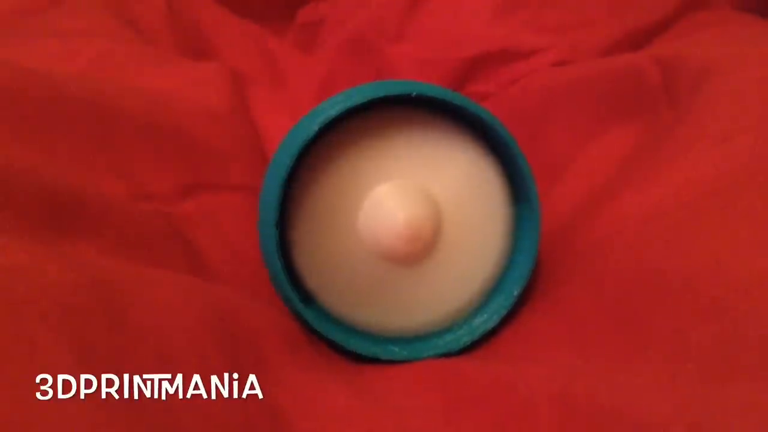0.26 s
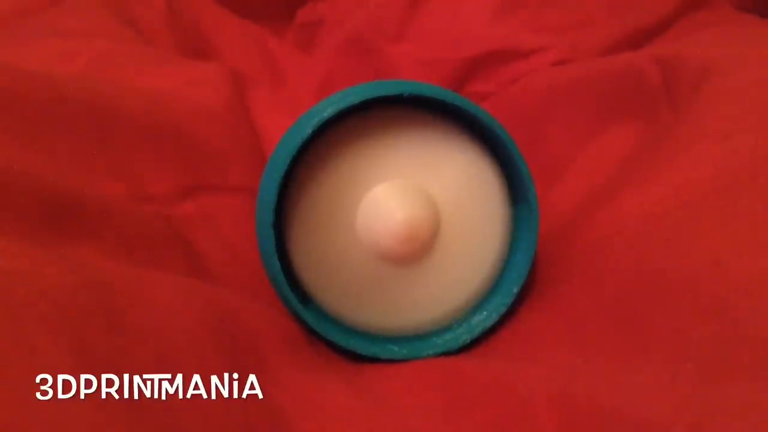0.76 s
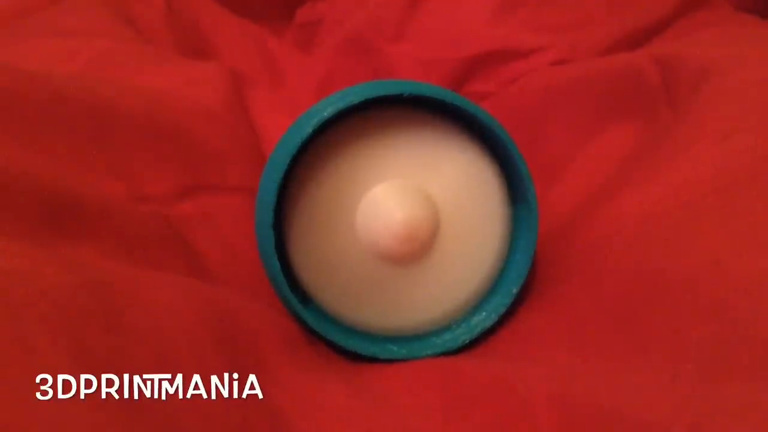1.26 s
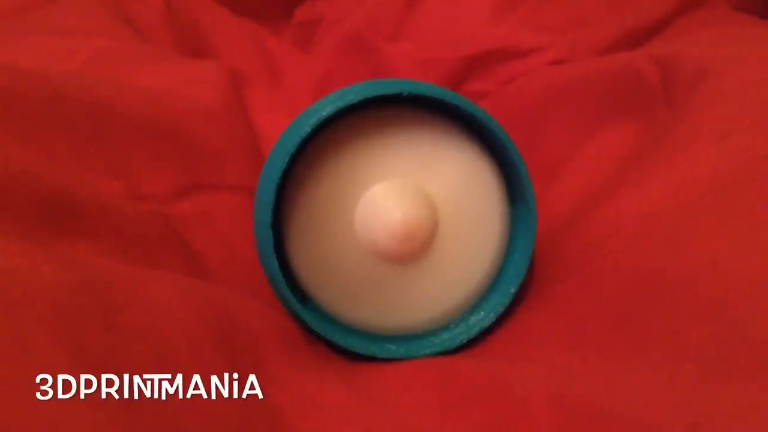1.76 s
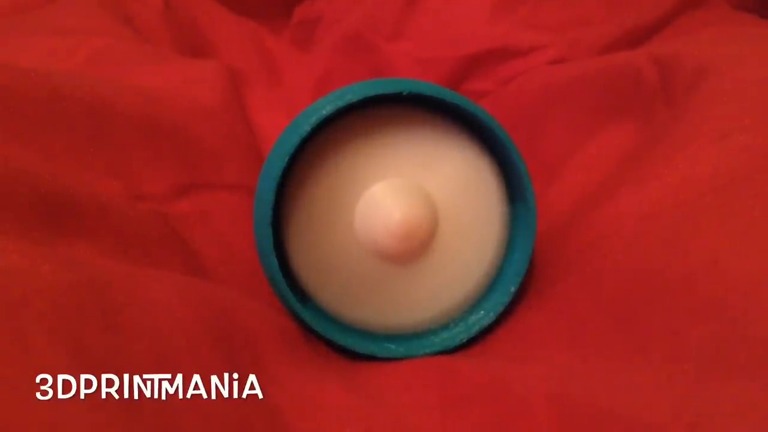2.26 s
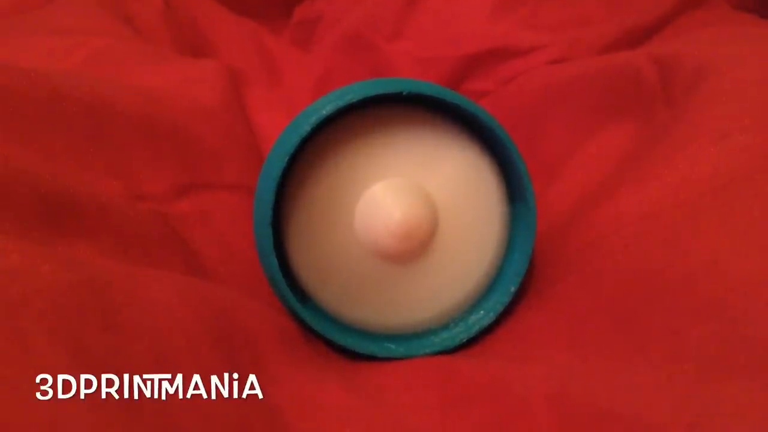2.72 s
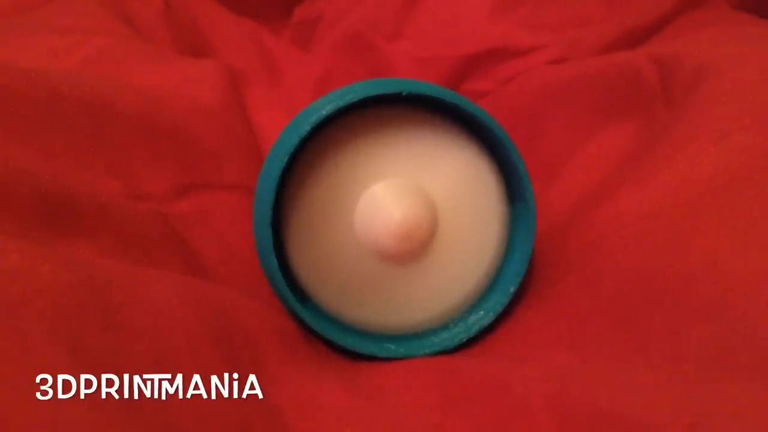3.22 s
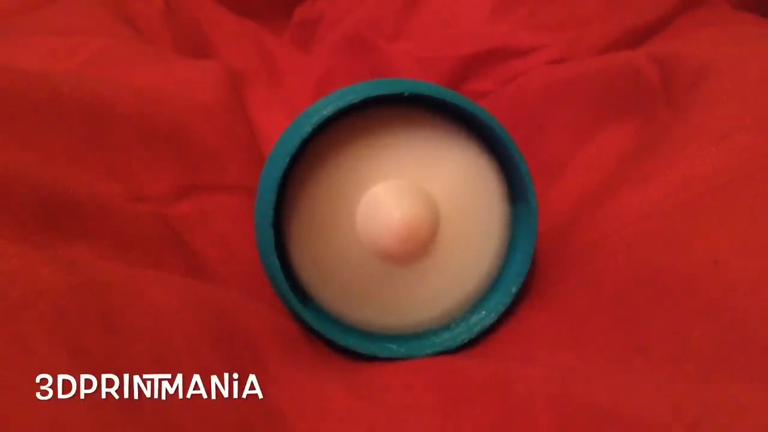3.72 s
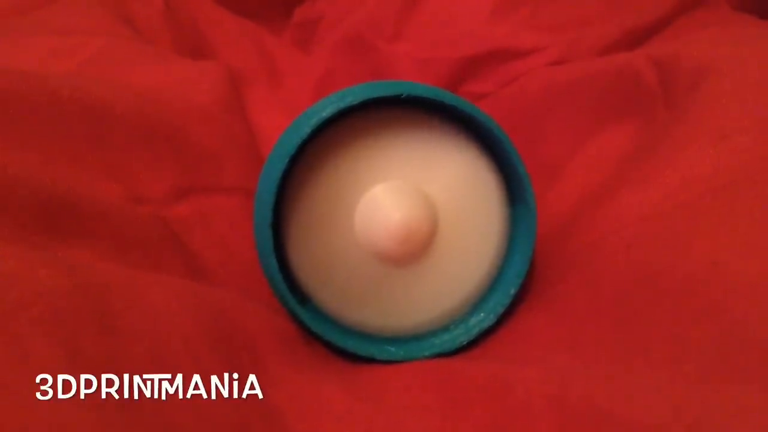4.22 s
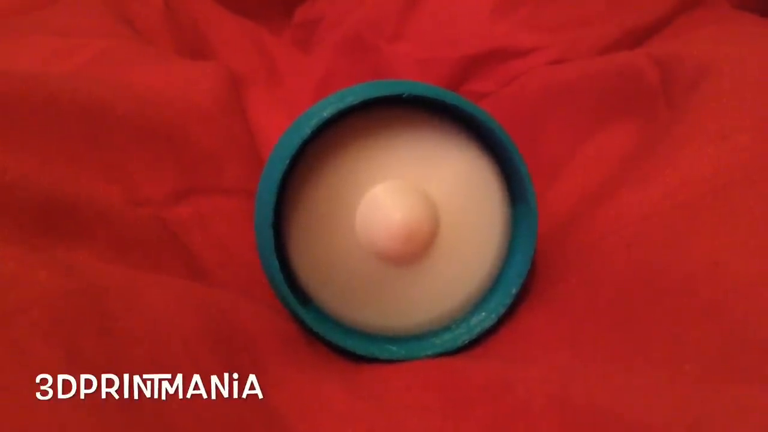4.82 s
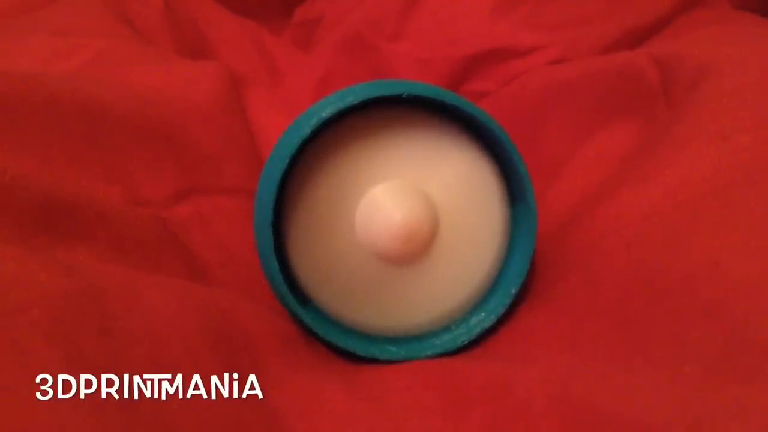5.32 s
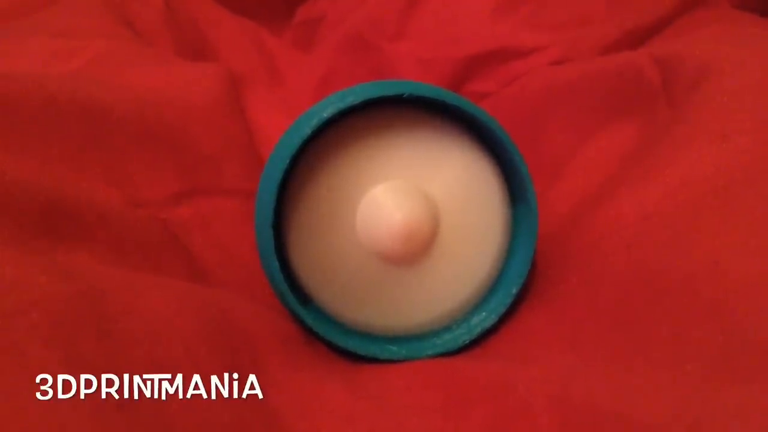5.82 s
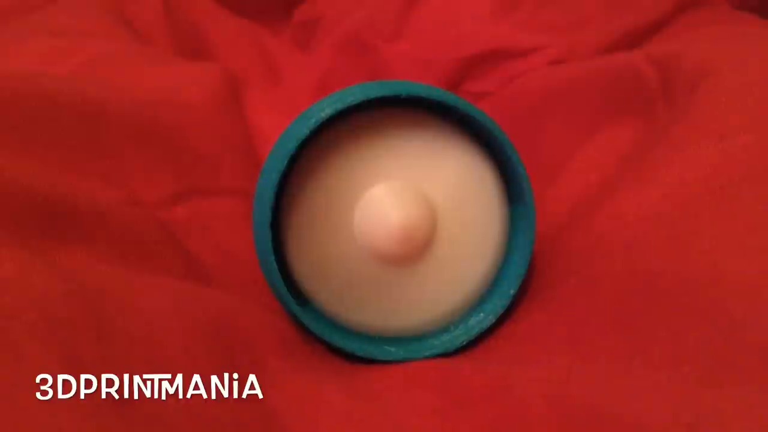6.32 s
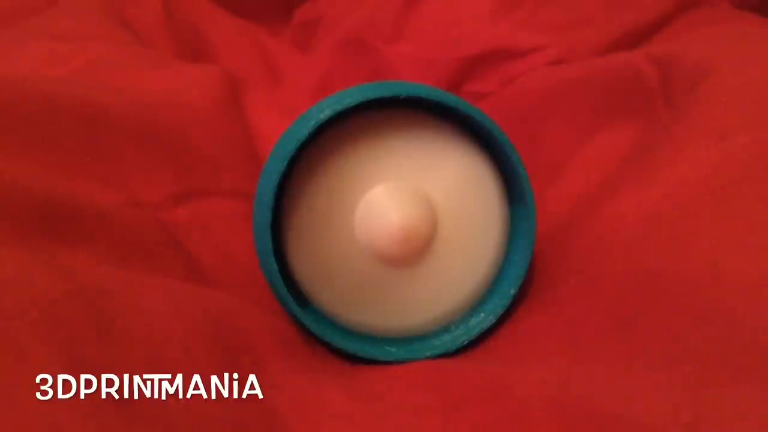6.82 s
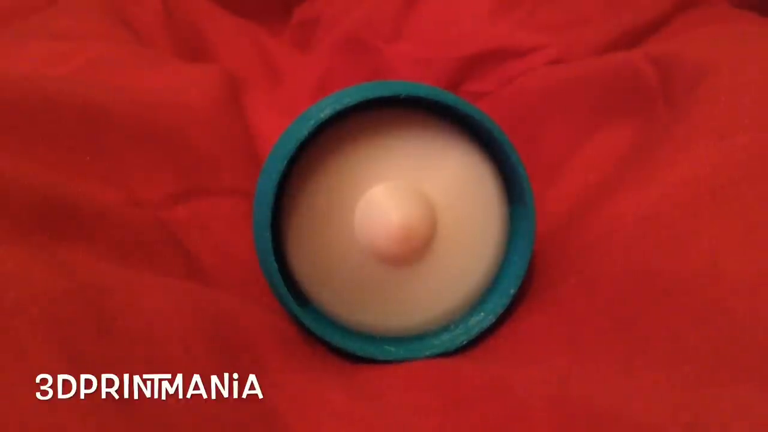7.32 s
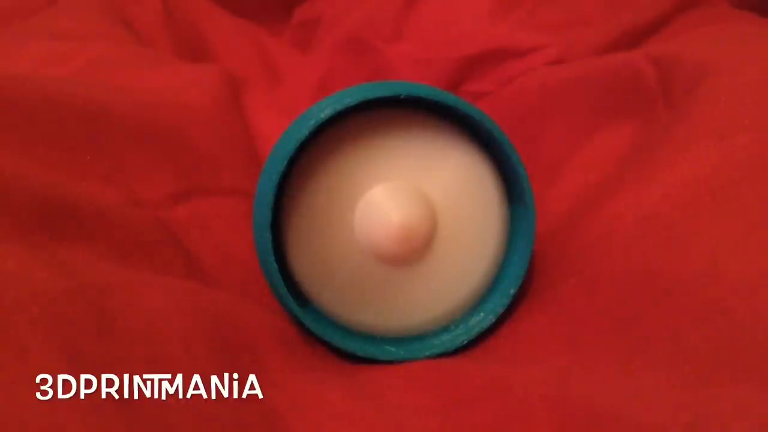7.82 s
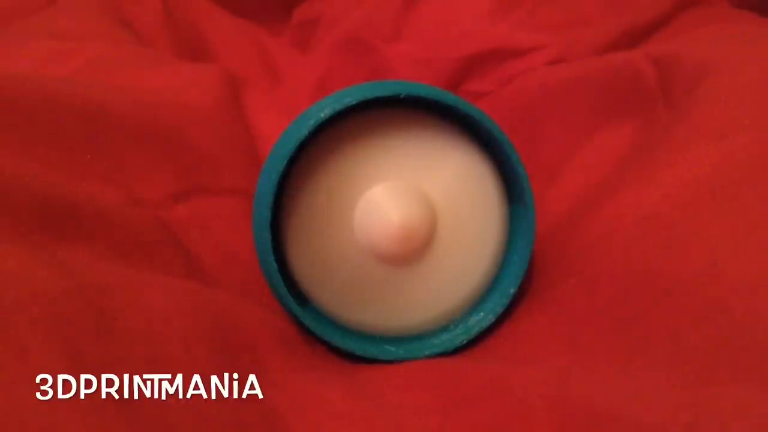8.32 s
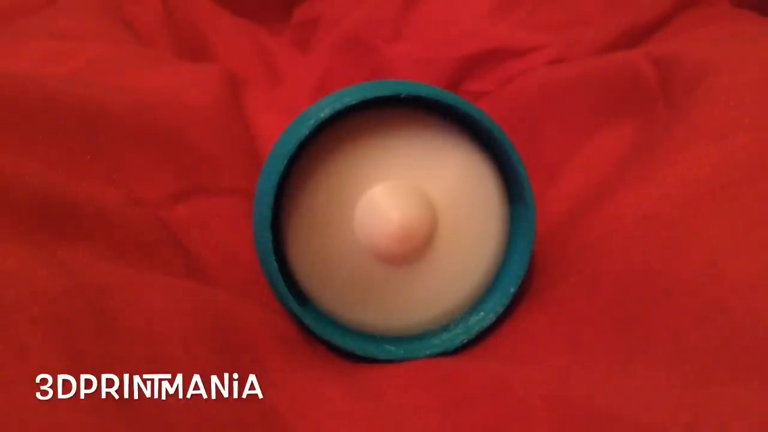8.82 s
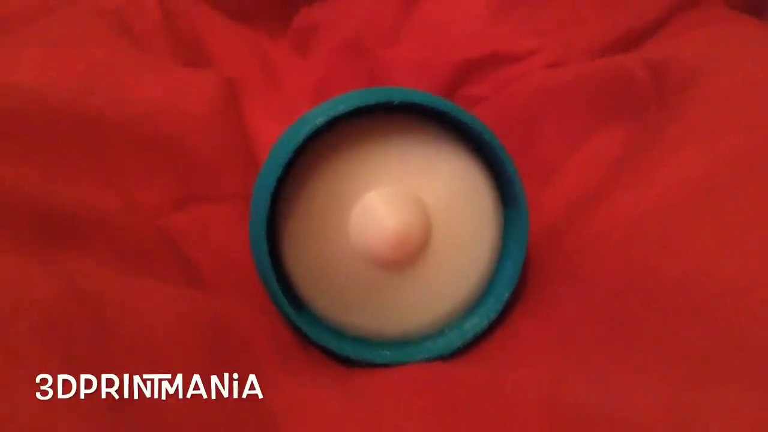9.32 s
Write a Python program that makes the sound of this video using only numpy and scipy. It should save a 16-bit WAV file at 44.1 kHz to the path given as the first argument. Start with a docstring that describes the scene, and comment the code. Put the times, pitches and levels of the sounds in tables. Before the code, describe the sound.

Brief cloth rustle and faint finger ticks, then a small brushed-motor fan spins up to a steady shrill whine with hum, airy rush and scattered taps.

```python
"""A small ducted fan on a cloth is switched on, spins up within two seconds and slowly loses speed.
Its rotor hums once and twice a turn, sings blade tones and pushes a rush of air through the duct;
the brushed motor sings a comb of shaft orders through its can, over brush hiss.
The chopped supply buzzes at a nearly fixed rate, as harmonics in step shaped by the windings.
A hand nearby rustles the cloth and ticks, in a quiet room with a faint hiss and steady hums."""
import sys
import numpy as np
from scipy import signal
from scipy.fft import rfft, irfft, next_fast_len
from scipy.io import wavfile

SR = 44100
rng = np.random.default_rng(int(sys.argv[2]) if len(sys.argv) > 2 else 0)


def unload_audio(sound):
    """Save the sound as a 16-bit wav file, at the path given as the first command line argument."""
    columns = np.transpose(np.atleast_2d(sound))
    # keep every value between -1 and 1, then stretch to whole-number steps
    steps = np.round(np.clip(columns, -1, 1) * 32767)
    wavfile.write(sys.argv[1], SR, steps.astype(np.int16))


def magnitude_from_level(level_db):
    """Linear magnitude for a level in decibels (20 dB per decade)."""
    exponent = np.asarray(level_db, float) / 20
    return 10 ** exponent


N = 421596
STEP = 64   # samples between values of a slow signal

# shaft speed the sagging supply can hold: time_s, turns_per_s
HELD_SPEED = [(.26, 108.115), (3.5, 106.86), (4.1, 106.58), (4.7, 106.15), (5.3, 105.88), (5.9, 105.45),
              (6.5, 105.33), (7.1, 104.97), (8.3, 104.46), (8.9, 104.45), (9.56, 104.15)]
# once-a-turn hum through the stand, before its slow fade: pitch_hz, level_db (rms)
ONCE_A_TURN = [(43, -90), (64, -74), (79, -62), (87, -81), (95, -58), (101, -52), (105.5, -49)]
# twice-a-turn hum through the duct: pitch_hz, level_db (rms)
TWICE_A_TURN = [(90, -92), (150, -64), (175, -52), (195, -62), (215, -65)]
# blade tones at top speed, before the duct resonance: multiple (of the shaft rate), level_db (rms), wobble_db
ROTOR_TONES = [(14, -68, 3), (15, -65, 3), (20, -56, 2.5), (26, -70, 3), (35, -71, 3), (39, -70, 3),
               (40, -69, 3), (41, -60, 2.5), (43, -70, 3)]
# duct resonance that carries the top rotor tones: pitch_hz, gain_db
DUCT_RESONANCE = [(3000, -22), (3900, -12), (4150, 1.7), (4500, -1.5)]
# colour of the motor can, one order before its own offset and the song level: pitch_hz, level_db (rms)
CAN_COLOUR = [(5600, -73), (5900, -71.2), (6250, -70.5), (6500, -62.8), (6800, -56.9), (7100, -58.5),
              (7450, -55.6), (7690, -50.5), (7735, -61), (7800, -60), (7950, -47.5), (8120, -41.1),
              (8400, -41.9), (8560, -49.1), (8700, -55), (8900, -64.4), (9300, -61.5), (9600, -68),
              (10300, -65.6), (11000, -72), (12300, -71.1), (13300, -62), (13700, -70)]
# level of the motor song over time: time_s, gain_db
SONG_LEVEL = [(.26, -18), (.45, 4), (.6, -2), (.8, 2), (1.3, 2), (4, 1), (8, 2), (9.56, 0)]
# the orders repeat in tens, one entry for each last digit of the multiple: gain_db
ORDER_PATTERN = [-1.6, .3, .9, -4.8, 2.1, -1.9, .5, 2.2, 4.3, -7.1]
# orders that break the pattern: multiple (of the shaft rate), extra_db
ODD_ORDERS = [(59, 10.6), (61, 10.2), (63, 10.5), (66, 8.6), (67, -8.7), (70, 4.2), (75, -10.2),
              (77, -14.8), (78, -12.5), (79, -10.8), (80, -8.2), (81, -8.8), (85, 3.4), (86, -3.1),
              (88, -7.7)]
# spectrum shape of the brush hiss: pitch_hz, density_db (per Hz, relative)
BRUSH_SPECTRUM = [(3900, -17), (4300, -11), (4700, -41), (5600, -27), (6300, -13), (6800, -21),
                  (7500, -48.5), (8300, 1.5), (8900, -18), (9500, -12), (10500, -10), (11000, -26),
                  (12300, -17), (13400, -4)]
# spectrum shape of the air rush: pitch_hz, density_db (per Hz, relative)
AIR_SPECTRUM = [(30, -32.5), (120, -6), (210, -0.5), (340, -3), (430, -9), (530, -2), (1100, -5),
                (1400, -4.5), (1900, 1.75), (2500, -4), (3700, -12), (4250, -11), (5400, -17), (9000, -44)]
# rate of the supply chopping: time_s, rate_hz
CHOP_RATE = [(.27, 204.6), (.5, 204.34), (2, 204.31), (5, 204.26), (9.56, 204.18)]
# resonances of the windings: centre_hz, top_db (rms), fall_below_db_per_khz, fall_above_db_per_khz
WINDING_RESONANCES = [(3270, -70, 80, 80), (4170, -67, 40, 40), (9230, -61, 60, 10), (10070, -45.8, 39, 36),
                      (12440, -48.5, 17.5, 105), (13330, -58, 20, 60), (15150, -55.5, 25, 120)]
# hand rubbing on cloth: start_s, length_s, level_db
CLOTH_RUBS = [(0, 0.06, -62), (0.164, 0.066, -56), (0.236, .022, -54)]
# ticks of the hand: start_s, peak_db, favoured_hz (pitch that the blow favours), contact_ms
HAND_TICKS = [(.012, -41.5, 1090, 3), (.056, -44.5, 1190, 4.8), (.161, -49, 1900, 1.5),
              (.2393, -27.5, 1060, 0.11), (.367, -38, 1500, 2.8), (1.069, -37, 900, 2.8),
              (1.145, -32.5, 1190, 2.2), (3.9317, -14, 1070, 1.3), (4.4993, -29, 2000, 1.5),
              (4.9627, -25.5, 780, 0.98), (5.609, -30, 1800, 2), (6.311, -27.5, 5900, 6.5),
              (9.02, -44, 150, 4.4), (9.18, -40, 200, 4), (9.3995, -31, 230, 1.2)]
# modes that a tick rings: pitch_hz, level_db (for a blow favouring that pitch), t60_s
RINGING_MODES = [(209, -5, 0.032), (370, -10, 0.023), (734, -50, 0.023), (850, -6, 0.037),
                 (1130, -4.5, 0.022), (1500, -2, 0.015), (1900, -7, 0.0059), (2640, 8, 0.011),
                 (3550, -3, 0.02), (4700, 1, 0.0068), (5920, 4, 0.03)]
# spectrum shape of the room hiss: pitch_hz, density_db (per Hz, relative)
ROOM_SPECTRUM = [(60, -46), (105, -39), (160, 0), (450, -32), (1070, -21), (3190, -18.5), (4300, -7),
                 (5200, -29), (6110, -38), (6550, 2), (7890, 5), (9070, -6), (9960, -23), (13300, -21),
                 (13800, -53)]
# faint steady hums in the room: pitch_hz, level_db (rms)
ROOM_HUMS = [(108, -79), (151, -74), (540, -77.5), (840, -72.5), (1435, -75)]
# narrow treble bands left weak or nearly empty: centre_hz, half_width_hz, gain_db
THIN_BANDS = [(11020, 118, -8.5), (14170, 220, -40)]

SWITCH_ON_S, BREAKAWAY_S, SPIN_UP_S = .267, .19, .3945
SHORTFALL = 1.06   # of the natural log of speed, at switch-on
HUM_FADE_DB_PER_S = 0.28
FIRST_MULTIPLE, LAST_MULTIPLE = 53, 127   # motor orders
BRUSH_HISS_DB = -49   # before it follows a share of the song level
RUSH_DB, RUSH_DB_PER_DECADE, SLOW_RUSH_DB = -43, 68, -59   # at top speed, growth with speed, least level
FAINTEST_DB, WHINE_FIZZ_DB = -73, -17   # weakest supply harmonic kept, unevenness of its pulses
RUB_ATTACK_S, RUB_RELEASE_S, CLOTH_SETTLING_DB = .004, .008, -69.5
ROOM_DB = -48   # hiss before throb and thinning
THROB_HZ, THROB_DEPTH, THROB_FADE_S = 36.5, .55, .35
HISS_THINS_DB, HISS_THINS_S = -2, 3.9


def rms_one(x):
    """Scale to rms 1."""
    return x / np.sqrt(np.mean(x ** 2) + 1e-20)


def seconds():
    """Time of every sample."""
    return np.arange(N) / SR


def in_time(rows):
    """Read a (time, value) table at every sample."""
    s, values = np.transpose(rows)
    return np.interp(seconds(), s, values)


def at_hz(points, hz):
    """Read a spectrum on a log-frequency axis."""
    point_hz, point_db = np.transpose(points)
    return np.interp(np.log(hz), np.log(point_hz), point_db)


def stretch(slow):
    """From one value every STEP samples to one a sample."""
    return np.interp(np.arange(N), STEP * np.arange(len(slow)), slow)


def drift(rate_hz):
    """Slow random wander of rms 1, one value every STEP samples."""
    r = np.exp(-2 * np.pi * rate_hz * STEP / SR)
    noise = rng.standard_normal(N // STEP + 1002)
    wander = signal.lfilter([1], [1, -2 * r, r * r], noise)
    return rms_one(wander[1000:])   # without the filter's start


def coloured(spectrum, beyond_db):
    """Noise of rms 1 with the given spectrum, much weaker beyond its ends."""
    size = next_fast_len(N)
    hz = np.arange(size // 2 + 1) * SR / size + 1e-3
    inside = (hz > spectrum[0][0]) & (hz < spectrum[-1][0])
    gain = magnitude_from_level(at_hz(spectrum, hz) + np.where(inside, 0, beyond_db))
    return rms_one(irfft(rfft(rng.standard_normal(size)) * gain, size)[:N])


def tone(angle, slow_db, wobble_db, wobble_hz):
    """A sine whose level and phase wander a little."""
    gain = magnitude_from_level(slow_db + wobble_db * drift(wobble_hz))
    slip = rng.uniform(0, 2 * np.pi) + 0.35 * drift(wobble_hz)   # radians
    return np.sqrt(2) * stretch(gain) * np.sin(angle + stretch(slip))


def fan():
    """One shaft drives rotor, motor and air; all three are silent until switch-on."""
    every_sample = shaft()
    angle = 2 * np.pi * np.cumsum(every_sample) / SR
    at = np.minimum(STEP * np.arange(N // STEP + 2), N - 1)
    turns = every_sample[at]
    hum_db = at_hz(ONCE_A_TURN, turns) - HUM_FADE_DB_PER_S * at / SR
    song_db = in_time(SONG_LEVEL)[at]
    running = np.arange(N) > SWITCH_ON_S * SR
    return (rotor(angle, turns, hum_db) + motor(angle, turns, song_db) + air(turns)) * running


def shaft():
    """Turns per second: off the mark, up to what the supply holds, then sagging with it."""
    since = np.maximum(seconds() - SWITCH_ON_S, 0)
    moving = 1 - np.exp(-(since / BREAKAWAY_S) ** 2)
    # the log of speed closes its shortfall exponentially
    reached = in_time(HELD_SPEED) * np.exp(-SHORTFALL * np.exp(-since / SPIN_UP_S))
    return 5 + (reached - 5) * moving   # the floor keeps logarithms finite


def rotor(angle, turns, hum_db):
    """Hum once and twice a turn from imbalance, with blade tones above that grow with speed."""
    out = tone(angle, hum_db, 0.24, 0.51)
    out += tone(2 * angle, at_hz(TWICE_A_TURN, 2 * turns), 2.1, 9.2)
    load_db = 50 * np.log10(turns / turns.max())
    for multiple, level_db, wobble_db in ROTOR_TONES:
        in_duct = multiple * turns.max() > DUCT_RESONANCE[1][0]
        duct_db = at_hz(DUCT_RESONANCE, multiple * turns) if in_duct else 0
        out += tone(multiple * angle, level_db + load_db + duct_db, wobble_db, 15.5)
    return out


def motor(angle, turns, song_db):
    """Brushes over the commutator repeat each turn; an order is loud while it crosses a can resonance."""
    s = STEP * np.arange(len(turns)) / SR
    straining = np.clip((2.0 - s) / .4, 0, 1)
    hiss_gain = magnitude_from_level(BRUSH_HISS_DB) * stretch(magnitude_from_level(0.13 * song_db))
    out = hiss_gain * coloured(BRUSH_SPECTRUM, beyond_db=-25)
    odd_db = dict(ODD_ORDERS)
    lowest_hz = CAN_COLOUR[0][0]
    for multiple in range(FIRST_MULTIPLE, LAST_MULTIPLE + 1):
        hz = multiple * turns
        # while the motor strains to speed up, all orders are weaker; near the can's main resonance
        # most upper orders are held back further, sparing every tenth
        held = multiple > 80 and multiple % 10 != 2
        near = np.exp(-((hz - 8230) / 450) ** 2)
        strain_db = straining * (-9.0 * near * held - 3.5)
        below_db = 0.09 * np.maximum(lowest_hz - hz, 0)   # falls away under the lowest resonance
        colour_db = at_hz(CAN_COLOUR, hz) - below_db
        own_db = ORDER_PATTERN[multiple % 10] + odd_db.get(multiple, 0)
        out += tone(multiple * angle, colour_db + own_db + song_db + strain_db, 0.45, 9.7)
    return out


def air(turns):
    """Turbulence through the duct grows with speed above a least level, gusting slightly."""
    speed_db = RUSH_DB + RUSH_DB_PER_DECADE * np.log10(turns / turns.max())
    rush_db = 10 * np.log10(magnitude_from_level(2 * speed_db) + magnitude_from_level(2 * SLOW_RUSH_DB))   # powers add
    gusts = stretch(magnitude_from_level(.3 * drift(3.0) + .6 * drift(25.0)))
    return magnitude_from_level(stretch(rush_db)) * gusts * coloured(AIR_SPECTRUM, beyond_db=-20)


def chopping():
    """Every current pulse kicks the windings: harmonics in step make a burst per pulse."""
    rate = in_time(CHOP_RATE)
    angle = 2 * np.pi * np.cumsum(rate) / SR
    out = np.zeros(N)
    uneven = signal.butter(2, 70, fs=SR / STEP, output="sos")
    for multiple in range(10, 76):
        khz = multiple * rate.mean() / 1000
        level_db = max(top_db - max(below * (hz / 1000 - khz), above * (khz - hz / 1000))
                       for hz, top_db, below, above in WINDING_RESONANCES)
        if level_db <= FAINTEST_DB:
            continue
        fizz = rms_one(signal.sosfilt(uneven, rng.standard_normal(N // STEP + 2)))   # no two pulses are alike
        gain = magnitude_from_level(level_db + 0.81 * drift(11.0)) * (1 + magnitude_from_level(WHINE_FIZZ_DB) * fizz)
        spread = .04 * (multiple - 55) ** 2   # radians: the burst is spread a little
        out += np.sqrt(2) * stretch(gain) * np.cos(multiple * angle + spread)
    return out * np.clip((seconds() - SWITCH_ON_S) / .003, 0, 1)


def hand():
    """A hand nearby: clumpy cloth rustle, and ticks of the fingers."""
    band = signal.butter(3, [620, 1550], "band", fs=SR, output="sos")
    clumps = stretch(magnitude_from_level(5.1 * drift(34.0)))
    rustle = rms_one(signal.sosfilt(band, rng.standard_normal(N))) * clumps
    out = rustle * rubbing()
    for start_s, peak_db, favoured_hz, contact_ms in HAND_TICKS:
        sound = tick(favoured_hz, contact_ms)
        at = int(start_s * SR)
        out[at:at + len(sound)] += magnitude_from_level(peak_db) * sound / abs(sound).max()
    return out


def rubbing():
    """Each rub swells, holds and dies; the cloth keeps settling for nearly half a second."""
    s = seconds()
    out = magnitude_from_level(CLOTH_SETTLING_DB) * (s < .45)
    for start_s, length_s, level_db in CLOTH_RUBS:
        swell = np.clip((s - start_s) / RUB_ATTACK_S, 0, 1)
        dying = np.exp(-np.maximum(s - start_s - length_s, 0) / RUB_RELEASE_S)
        out = out + magnitude_from_level(level_db) * swell * dying
    return out


def tick(favoured_hz, contact_ms):
    """A short scratchy contact rings the modes near its own pitch."""
    grit = rng.standard_normal(2048)
    after_ms = np.arange(len(grit)) * 1000 / SR
    contact = grit * after_ms * np.exp(-2 * after_ms / contact_ms)
    out = np.zeros(len(grit))
    for hz, level_db, t60_s in RINGING_MODES:
        r = magnitude_from_level(-60 / (t60_s * SR))   # decay per sample
        w = 2 * np.pi * hz / SR
        strength = magnitude_from_level(level_db - 13.6 * abs(np.log2(hz / favoured_hz)))   # dB per octave away
        out += strength * signal.lfilter([1, 0, -1], [1, -2 * r * np.cos(w), r * r], contact)
    soft = signal.butter(1, min(4.8 * favoured_hz, .4 * SR), fs=SR)   # a fingertip is soft
    return signal.lfilter(*soft, out)


def room():
    """The room's own hiss, throbbing at first and thinning over some seconds, with faint hums."""
    s = seconds()
    out = magnitude_from_level(ROOM_DB) * coloured(ROOM_SPECTRUM, beyond_db=-13)
    out *= 1 + THROB_DEPTH * np.exp(-s / THROB_FADE_S) * np.cos(2 * np.pi * THROB_HZ * s)
    out *= magnitude_from_level(HISS_THINS_DB * np.clip(s / HISS_THINS_S, 0, 1))
    for hz, level_db in ROOM_HUMS:
        out += tone(2 * np.pi * hz * s, level_db, 2.0, 32.0)
    return out


def scene():
    """Fan, supply, hand and the quiet room, as one channel."""
    return (fan() + chopping() + hand() + room())[None]


def thin_treble(x):
    """Two narrow treble bands are left weak or nearly empty."""
    size = next_fast_len(N)
    hz = np.arange(size // 2 + 1) * SR / size
    thin_db = sum(gain_db * np.exp(-((hz - centre_hz) / half_width_hz) ** 4)
                  for centre_hz, half_width_hz, gain_db in THIN_BANDS)
    return irfft(rfft(x, size) * magnitude_from_level(thin_db), size)[:, :N]


def microphone(x):
    """The deepest bass is dropped by the microphone."""
    bass_cut = signal.butter(2, 70, "high", fs=SR, output="sos")
    return signal.sosfilt(bass_cut, x)


def top_cut(x):
    """Nothing passes above the cut-off."""
    return signal.sosfilt(signal.butter(12, 15630, fs=SR, output="sos"), x)


def record(dry):
    """The scene with its thin treble bands, through the microphone."""
    mix = microphone(thin_treble(dry))
    return top_cut(mix)


dry = scene()
out = record(dry)
unload_audio(out)
```